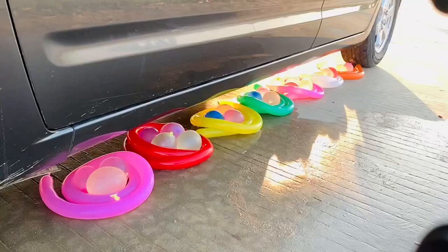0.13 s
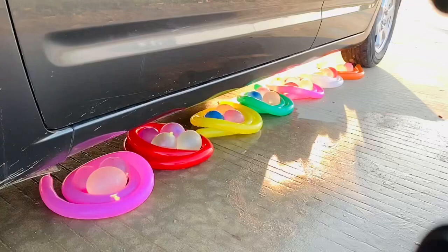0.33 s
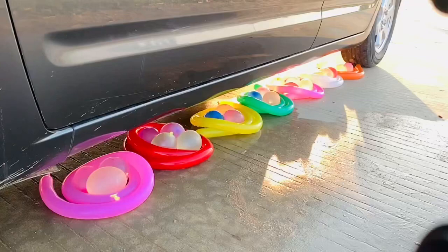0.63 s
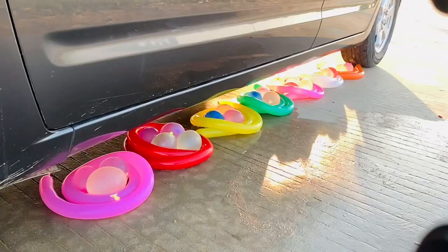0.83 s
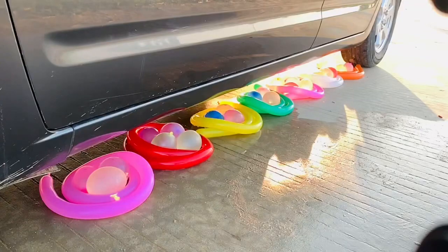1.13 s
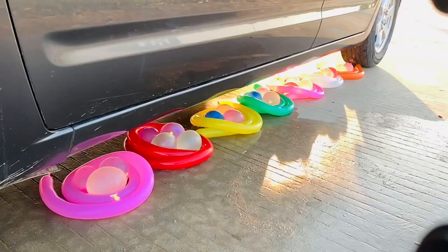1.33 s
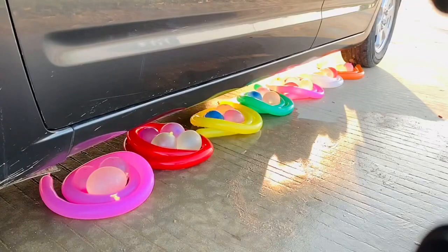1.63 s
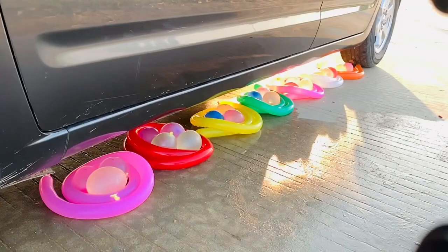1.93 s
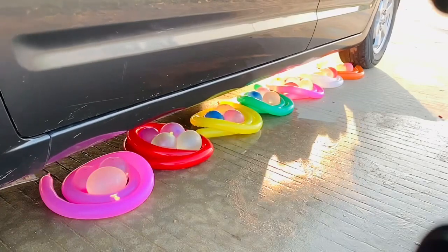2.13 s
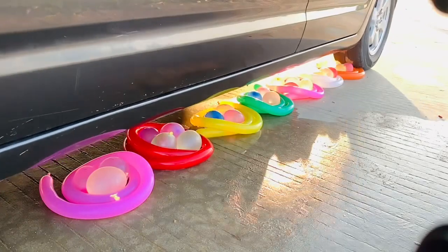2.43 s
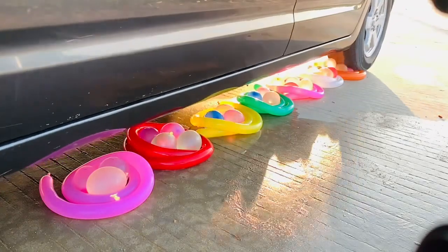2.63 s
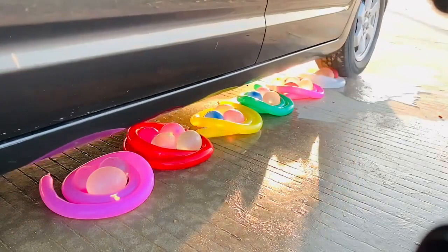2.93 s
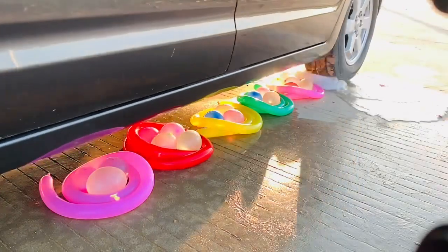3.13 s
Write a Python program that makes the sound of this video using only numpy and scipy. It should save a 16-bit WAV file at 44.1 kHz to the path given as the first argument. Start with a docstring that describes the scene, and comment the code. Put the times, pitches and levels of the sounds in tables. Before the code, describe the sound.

Water balloons pop sharply beneath a car wheel after a long stretch of low engine rumble and fan-like hum; splatter and small squeaks follow, then another crack, heard close in stereo with short dull echoes under the car.

```python
"""Water balloons burst under a car that idles on wet concrete, then rolls, near a two-port microphone.
Each burst is a decaying noise crack and splat plus a torn click train that rings and thumps;
drips are small bursts, droplets are rising blips, and dull echoes come from under the car.
The engine is shaped noise with wavering sines: firing orders, a fan-like hum, drones and thin
whistles. Wet rubber squeaks as the tyre slips."""
import sys
import numpy as np
from scipy import signal
from scipy.fft import rfft, irfft, next_fast_len
from scipy.io import wavfile
from scipy.ndimage import uniform_filter1d

SR = 44100
rng = np.random.default_rng(int(sys.argv[2]) if len(sys.argv) > 2 else 0)


def amplitude_ratio(level_db):
    """Convert a level in decibels to the matching linear amplitude (field) ratio."""
    exponent = np.asarray(level_db, float) / 20
    return 10 ** exponent


def int16_out(signal):
    """Quantize to a 16-bit WAV file."""
    q = np.round(np.clip(np.atleast_2d(signal).T, -1, 1) * 32767)
    wavfile.write(sys.argv[1], SR, q.astype(np.int16))


N = 144648

# Engine load. Each row: time in seconds, roar level change in dB, treble lift in dB (in full
# only far above 2 kHz), level change of the second firing order in dB.
ENGINE_LOAD = [(0, 1.5, 3.5, -7), (.4, 3, 3.5, -4), (.9, 0.5, 5, -9), (1.5, 3, 2.5, 4), (2.1, 0, 7, -25),
               (2.65, 2, 4, 6), (2.8, -0.5, 7, 5.5), (3.0, 0, 5.5, 4.5), (3.28, -1.5, 14.5, 14.5)]


def read(points, hz):
    """Interpolates (Hz, value) points over log frequency."""
    f, value = np.transpose(points)
    return np.interp(np.log(hz + 1), np.log(f + 1), value)


def curve(rows, col, t):
    """Interpolates one column of rows that start with a time."""
    return np.interp(t, np.array(rows)[:, 0], np.array(rows)[:, col])


def evened(x):
    """Scales to rms 1."""
    return x / np.sqrt(np.mean(x ** 2) + 1e-20)


def slow(t, top_hz):
    """Slow random drift of rms 1: 20 sines over a decade up to top_hz."""
    freqs_hz = np.geomspace(top_hz / 10, top_hz, 20)
    return evened(sum(np.sin(2 * np.pi * (f * t + rng.random())) / np.sqrt(f) for f in freqs_hz))


def sine(cycles):
    """Sine of rms 1 from its phase in cycles."""
    return np.sqrt(2) * np.sin(2 * np.pi * cycles)


def panned(x, left_minus_right_db):
    """Splits a level difference evenly between the ports."""
    return x * amplitude_ratio([[left_minus_right_db / 2], [-left_minus_right_db / 2]])


def resonate(x, hz, width_hz):
    """One resonance: shift to 0 Hz, one-pole low-pass, shift back."""
    turn = np.exp(2j * np.pi * hz * np.arange(x.shape[-1]) / SR)
    r = np.exp(-np.pi * width_hz / SR)
    return 2 * (turn * signal.lfilter([1 - r], [1, -r], x / turn)).real


def side_of(hz):
    """Complex gain of the left port for the engine; the right one is its inverse."""
    # Each row: frequency in Hz, left minus right level in dB.
    tilt = [(60, -1.0), (180, -1.5), (550, 0), (1650, 4), (4970, 1), (15000, -0.5)]
    # Each row: frequency in Hz, phase lead of the left port in radians.
    lead = [(0, 0), (480, .6), (1120, 1.4), (1600, 2.2), (1950, 2.4), (2930, 3.7), (4220, 4.9), (7000, 6.5),
            (10000, 11.3), (16500, 18)]
    return amplitude_ratio(read(tilt, hz) / 2) * np.exp(.5j * np.interp(hz, *np.transpose(lead)))


def ports(x):
    """Phase lead and balance of a source on the engine side."""
    size = next_fast_len(N + 64)
    side = side_of(np.fft.rfftfreq(size, 1 / SR))
    return irfft(rfft(x, size) * np.array([side, 1 / side]), size)[:, :N]


def roar(firings):
    """Intake, exhaust and fan noise in drifting patches, throbbing at half the firing rate."""
    # Each row: frequency in Hz, relative density in dB per Hz.
    spectrum = [(40, -10), (70, -5), (110, -1.5), (180, -8.5), (260, -6.5), (400, -9.5), (700, -13.5),
                (1100, -17), (1500, -17), (1950, -23.5), (2300, -21), (2800, -20), (3400, -22),
                (4200, -27.5), (5500, -30), (7000, -29.5), (8500, -29), (9300, -40.5), (10300, -34),
                (13500, -39), (13800, -25.5), (14300, -69), (15000, -100)]
    # Each row: frequency in Hz, left-right correlation (0 to 1).
    likeness = [(60, 0.88), (300, 0.99), (800, 0.24), (2000, 1), (5000, 0.26), (12000, 0.32)]
    base_db, throb_depth = -36.5, 0.098
    frames, hz = N // 256 + 5, np.fft.rfftfreq(1024, 1 / SR)[:, None]
    a, b, c, d, patches = rng.standard_normal((frames, 513, 5)).T
    patches = evened(uniform_filter1d(uniform_filter1d(patches, 8, 0), 12, 1))
    t = np.arange(frames) * 256 / SR
    same = np.clip(read(likeness, hz), -1, 1)
    left = a + 1j * b
    right = same * left + np.sqrt(1 - same ** 2) * (c + 1j * d)
    side = side_of(hz)
    treble_db = curve(ENGINE_LOAD, 2, t) * hz / (hz + 2000)
    gain = amplitude_ratio(read(spectrum, hz) + 1.4 * patches + 0.44 * slow(t, 8) + treble_db)
    z = np.array([left * side, right / side]) * gain
    x = evened(signal.istft(z, nperseg=1024, noverlap=768)[1][:, :N])
    level = amplitude_ratio(base_db + curve(ENGINE_LOAD, 1, np.arange(N) / SR))
    return level * x * (1 + throb_depth * np.cos(np.pi * firings))


def drones():
    """Steady-pitched drones of the idling car as sines that waver in level and phase."""
    # Each row: frequency in Hz, rms level in dB.
    drone_rows = [(165, -50), (354.2, -48.5)]
    t = np.arange(N) / SR
    return sum(amplitude_ratio(db + 2.5 * slow(t, 10)) * sine(hz * t + .08 * slow(t, 9)) for hz, db in drone_rows)


def hum():
    """Fan-like hum: wavering sines at multiples of one pitch."""
    # Each row: multiple of base_hz, rms level in dB.
    multiples = [(3, -54), (4, -57), (5, -55.5), (6, -56), (8, -58), (9, -57), (10, -55), (12, -53.5)]
    base_hz = 160.3
    t = np.arange(N) / SR
    return sum(amplitude_ratio(db + 2 * slow(t, 15)) * sine(k * base_hz * t + .05 * slow(t, 9)) for k, db in multiples)


def firing_orders(firings):
    """Multiples of the firing rate as wavering sines; the second follows the load."""
    # Each row: multiple of firing rate, rms level in dB, rms waver in dB.
    orders = [(1, -46, 2), (2, -50, 2), (3, -39, 1.2), (4, -52, 1.5), (5, -55, 2), (6, -56, 2)]
    t = np.arange(N) / SR
    out = np.zeros(N)
    for k, db, waver_db in orders:
        load_db = (k == 2) * curve(ENGINE_LOAD, 3, t)
        level = amplitude_ratio(db + waver_db * slow(t, 12) + load_db)
        out += level * sine(k * firings + rng.random() + .04 * slow(t, 9))
    return out


def whistles():
    """Thin whistles: sines on drifting pitch tracks, fluttering in level and pitch."""
    # One track per whistle. Each row: time in seconds, frequency in Hz, rms level in dB.
    tracks = [
        [(.03, 9835, -55), (.2, 9820, -54), (.32, 9760, -57), (.5, 9790, -56), (.7, 9920, -56), (.9, 9965, -55),
         (1.13, 9840, -54), (1.28, 9680, -54), (1.49, 9620, -54)],
        [(1.5, 10242, -53), (2.1, 10255, -55), (2.15, 10255, -68), (2.3, 10245, -63), (2.42, 10240, -72),
         (2.5, 10235, -56), (2.6, 10242, -55), (2.64, 10240, -72), (2.88, 10235, -68), (2.93, 10232, -55),
         (2.99, 10222, -68), (3.09, 10208, -56), (3.28, 10215, -64)],
        [(.03, 6820, -58), (.32, 6790, -63), (.65, 6850, -59), (.9, 6895, -55), (1.1, 6850, -59),
         (1.4, 6690, -66)],
        [(1.85, 7255, -68), (2.12, 7258, -63), (2.24, 7262, -57), (2.57, 7262, -54), (2.62, 7262, -70),
         (3.05, 7270, -66), (3.17, 7283, -56), (3.24, 7295, -66)],
    ]
    # Per whistle: left minus right in dB, before the engine-side balance.
    pans_db = [-5, -4, 7, 5]
    # Each row, per whistle: rms level flutter in dB, rms pitch flutter in Hz.
    flutters = [(1.5, 10), (1.5, 5), (3, 10), (2, 6)]
    t = np.arange(N) / SR
    out = np.zeros((2, N))
    for rows, pan_db, (flutter_db, flutter_hz) in zip(tracks, pans_db, flutters):
        on = uniform_filter1d(1. * ((t > rows[0][0]) & (t < rows[-1][0])), 500)
        level = amplitude_ratio(curve(rows, 2, t) + flutter_db * slow(t, 60))
        hz = curve(rows, 1, t) + flutter_hz * slow(t, 50)
        out += panned(on * level * sine(np.cumsum(hz) / SR), pan_db)
    return out


def squeaks():
    """Wet rubber slips under the tyre: short sines with jittering pitch and level."""
    # Each row: start in seconds, length in seconds, frequency in Hz, mid-squeak rms level in dB,
    # left minus right in dB.
    slips = [(2.80, .15, 2590, -53, -1), (3.115, .03, 2880, -44, 0), (3.18, .07, 2885, -48.5, 7),
             (3.14, .06, 3350, -49, 1)]
    t = np.arange(N) / SR
    out = np.zeros((2, N))
    for start_s, length_s, hz, db, pan_db in slips:
        shape = np.sqrt(abs(np.sin(np.pi * np.clip((t - start_s) / length_s, 0, 1))))
        x = shape * amplitude_ratio(db + 2.5 * slow(t, 120)) * sine(np.cumsum(hz + 20 * slow(t, 60)) / SR)
        out += panned(np.array([np.roll(x, 4), x]), pan_db)  # left port 4 samples late
    return out


def underside(x):
    """Dense dull echoes between concrete and car floor: sparse decaying random taps."""
    t60_s, band_hz = .12, [400, 4000]
    t = np.arange(SR // 3) / SR
    taps = rng.choice([-1., 1.], (2, len(t))) * (rng.random((2, len(t))) < .06)
    taps = taps * amplitude_ratio(-60 * t / t60_s) * (t > .003)
    taps = signal.sosfilt(signal.butter(2, band_hz, "band", fs=SR, output="sos"), taps)
    return signal.fftconvolve(x, taps / np.linalg.norm(taps[0]), axes=1)[:, :N]


def spatter():
    """Droplets land at random as short rising blips of a few cycles."""
    start_s, end_s, drops_per_s, weakest_db = 2.74, 3.28, 200, -53
    t, u, out = np.arange(N) / SR, np.arange(600) / SR, np.zeros(N)
    for hz in np.geomspace(1300, 4200, 16):
        hits = (rng.random(N) < drops_per_s / 16 / SR) * (t > start_s) * (t < end_s)
        strength = amplitude_ratio(4.6 * np.minimum(rng.exponential(1, N), 3))
        blip = np.sin(2 * np.pi * hz * u * (1 + 12 * u)) * np.exp(-u * hz / 8.4)
        blip *= np.minimum(u / 0.0004, 1)
        out += signal.oaconvolve(hits * strength, blip)[:N]
    return amplitude_ratio(weakest_db) * np.array([np.roll(out, 2), out])


def burst(start_s, crack_db, crack_t60_s, lift_db, splat_db, ring_hz, ring_db, thump_db, pan_db):
    """The skin rips in a few clicks that ring and thump; air and water crack and splat."""
    # Each row: frequency in Hz, relative density in dB per Hz.
    crack_spectrum = [(200, -45), (400, -38), (1000, -4), (3000, -12.5), (4000, -5.5), (7500, -3.5),
                      (9000, -9), (12000, -7.5), (15500, -8), (16500, -47)]
    # Each row: frequency in Hz, relative density in dB per Hz.
    splat_spectrum = [(210, -62), (350, 2), (576, 3.5), (1210, -11), (1820, -5), (2840, -12), (3280, -1.5),
                      (4680, -23), (8000, -35), (10400, -57), (17600, -120)]
    splat_t60_s, tear_s, rips_per_s = 0.077, .001, 500
    ring_width_hz, thump_hz, thump_width_hz = 330, 720, 600

    def top(x):
        """Scales the first 220 samples to rms 1."""
        return x / np.sqrt(np.mean(x[:, :220] ** 2))

    t = np.arange(8192) / SR
    a, b, c, d, e, lumps = rng.standard_normal((6, len(t)))
    ragged = amplitude_ratio(1.1 * evened(uniform_filter1d(lumps, 30)))
    hz = np.fft.rfftfreq(len(t), 1 / SR)

    crack_gain = amplitude_ratio(read(crack_spectrum, hz) + lift_db * np.clip(hz / 4000 - 2, 0, 1))
    crack = evened(irfft(rfft([a + 0.45 * b, a + 0.88 * c]) * crack_gain))
    crack = crack * amplitude_ratio(-60 * t / crack_t60_s)
    splat = evened(irfft(rfft([d + .5 * e, d + .5 * b]) * amplitude_ratio(read(splat_spectrum, hz))))
    splat = splat * amplitude_ratio(-60 * t / splat_t60_s)

    rips = (rng.random(len(t)) < rips_per_s / SR) | (t == 0)
    tear = rips * (1 + 0.83 * e) + 0.017 * np.array([b, c])
    tear = tear * (0.44 + t / tear_s) * np.exp(-t / tear_s)
    ring = resonate(tear, ring_hz, ring_width_hz)
    ring = top(resonate(ring, ring_hz, 3 * ring_width_hz))
    thump = resonate(tear * a, thump_hz, thump_width_hz)
    thump = resonate(thump, thump_hz, 2 * thump_width_hz)
    thump = top(signal.sosfilt(signal.butter(3, 380, "high", fs=SR, output="sos"), thump))

    body = ragged * amplitude_ratio(splat_db) * splat + amplitude_ratio(ring_db) * ring + amplitude_ratio(thump_db) * thump
    # the wheel is a little to the right: the left port is late
    body[0] = np.append([0, 0], body[0, :-2])
    crack[0] = np.append(0, crack[0, :-1])
    sound = np.minimum(t / 0.00042, 1) * (ragged * amplitude_ratio(crack_db) * crack + body)
    out, at = np.zeros((2, N + len(t))), round(start_s * SR)
    out[:, at:at + len(t)] = panned(sound, pan_db)
    return out[:, :N]


def drips():
    """Splashes and drips: weak bursts with a short crack and almost no thump."""
    # Each row: start in seconds, crack and splat level in dB, ring frequency in Hz, ring level in dB.
    drip_rows = [(2.787, -54, 1650, -44), (2.797, -45, 2250, -42), (2.82, -55, 2620, -40.5),
                 (2.85, -46, 2550, -39.5), (2.852, -55, 1800, -50), (2.897, -56, 2630, -46),
                 (2.9612, -35, 3660, -44), (2.9645, -44, 2920, -54), (3.037, -60, 3360, -44),
                 (3.0605, -42, 1930, -40), (3.08, -45, 3250, -38), (3.097, -46, 1300, -38),
                 (3.1023, -45, 1920, -34), (3.11, -41, 4200, -44), (3.131, -38, 4500, -49),
                 (3.149, -55, 3160, -40), (3.233, -60, 2500, -41)]
    return sum(burst(s, db, .025, 0, db, hz, ring_db, -80, -1) for s, db, hz, ring_db in drip_rows)


def balloons():
    """Water balloons give way in clusters of overlapping bursts."""
    # Each row: start in seconds, crack level in dB, crack t60 in seconds, crack lift above 8 kHz
    # in dB (full at 12 kHz), splat level in dB, ring frequency in Hz, ring level in dB,
    # thump level in dB, left minus right in dB.
    pops = [(2.6755, -38.5, 0.1, 4, -40, 3040, -37, -62, -2),
            (2.6825, -45, .06, 0, -42, 3400, -36, -62, -2), (2.7132, -20, 0.02, 9, -27, 3200, -33, -26, -1),
            (2.7154, -22, 0.03, 5, -30, 6800, -30, -27, -1),
            (2.7195, -37, 0.025, 0, -26, 2600, -36, -28, -2),
            (2.7396, -21, 0.045, 0, -19, 2460, -18.5, -26, 1),
            (2.7403, -35, .03, 0, -26.5, 3520, -24, -42, -.5),
            (2.7413, -42, 0.026, 0, -24, 1724, -14.5, -29.5, 1),
            (3.0598, -24.5, 0.018, 0, -46, 3280, -30.5, -52, -2),
            (3.2676, -14.5, 0.04, -5, -30, 3850, -30, -36, -1),
            (3.2712, -25, .09, -5, -31, 2300, -31, -29, 0)]
    return sum(burst(*row) for row in pops)


def scene():
    """Engine, squeaks, and water with its echoes."""
    # Each row: time in seconds, firing rate in Hz.
    speed = [(0, 70.44), (.6, 70.51), (1.1, 70.58), (1.6, 69.56), (2.3, 69.84), (2.8, 70.9), (3.28, 69.87)]
    firings = np.cumsum(curve(speed, 1, np.arange(N) / SR)) / SR
    engine = roar(firings) + ports(drones() + hum() + firing_orders(firings) + whistles())
    water = spatter() + drips() + balloons()
    return engine + squeaks() + water + amplitude_ratio(-19) * underside(water)


def band_limit(x):
    """A steep low-pass at the top of the band."""
    return signal.sosfilt(signal.butter(12, 16640, fs=SR, output="sos"), x)


def record(dry):
    """Low cut and fade-in."""
    start_s, fade_s, low_cut_hz = 0.032, 0.06, 60
    fade = np.clip((np.arange(N) / SR - start_s) / fade_s, 0, 1) ** 1.26
    cut = signal.sosfilt(signal.butter(5, low_cut_hz, "high", fs=SR, output="sos"), dry)
    return band_limit(cut * fade)


dry = scene()
out = record(dry)
int16_out(out)
```